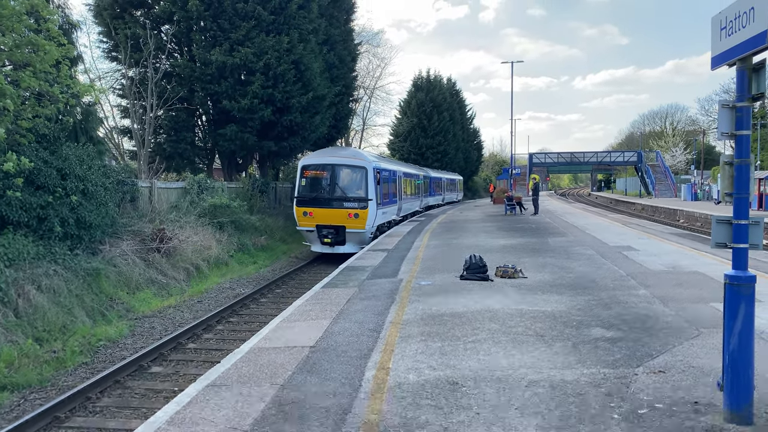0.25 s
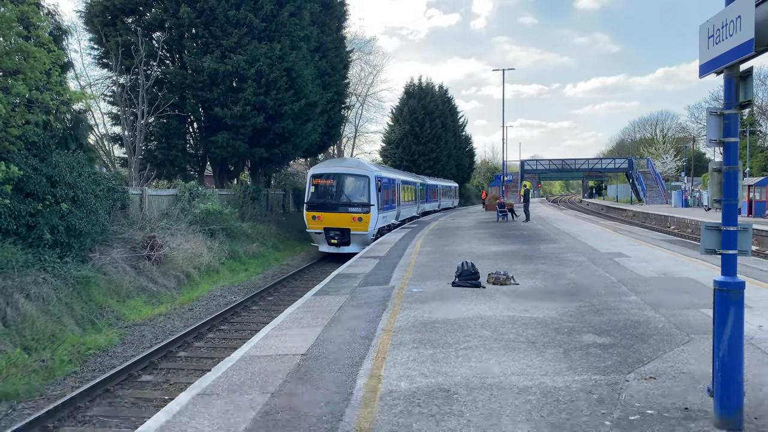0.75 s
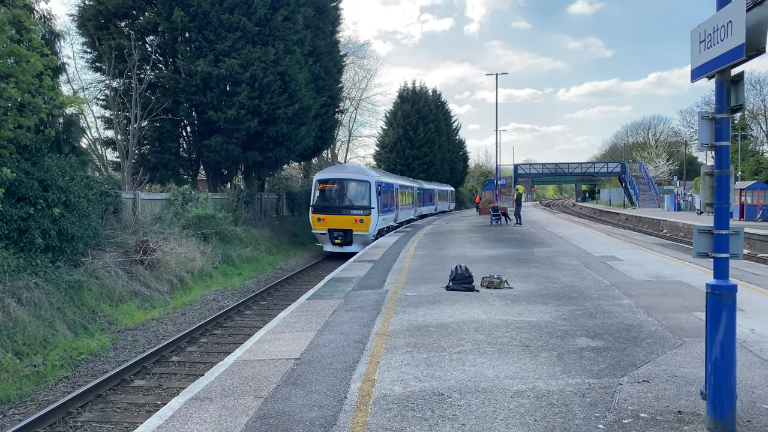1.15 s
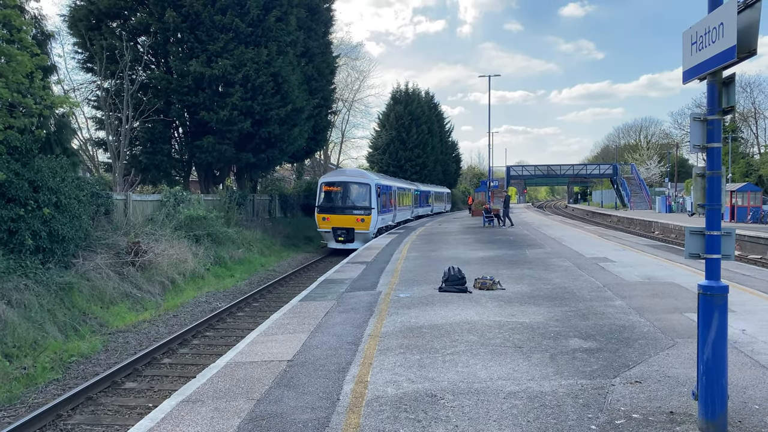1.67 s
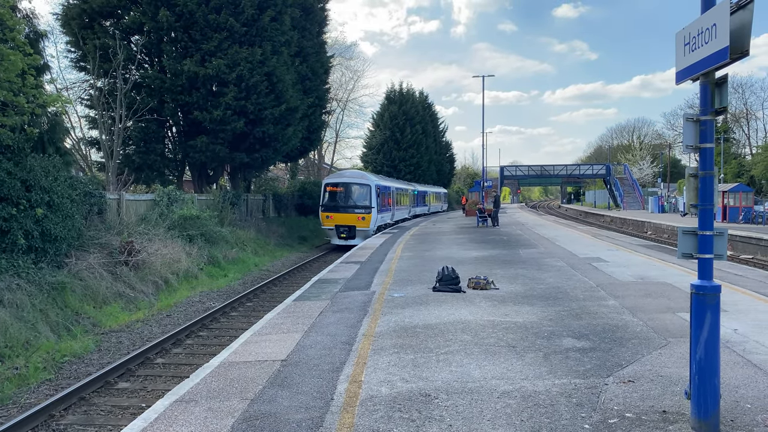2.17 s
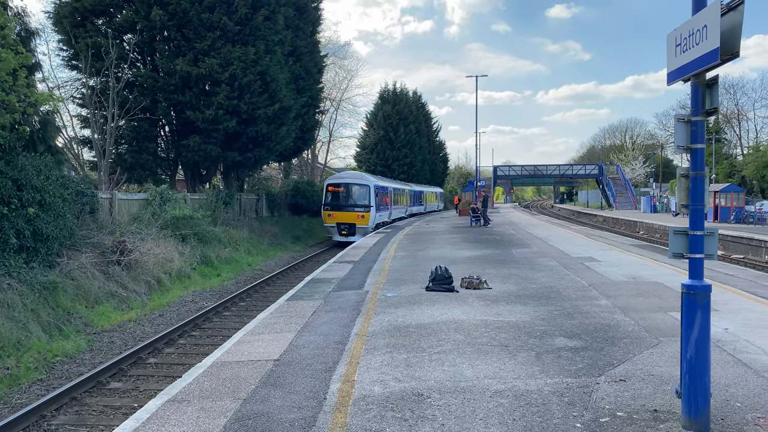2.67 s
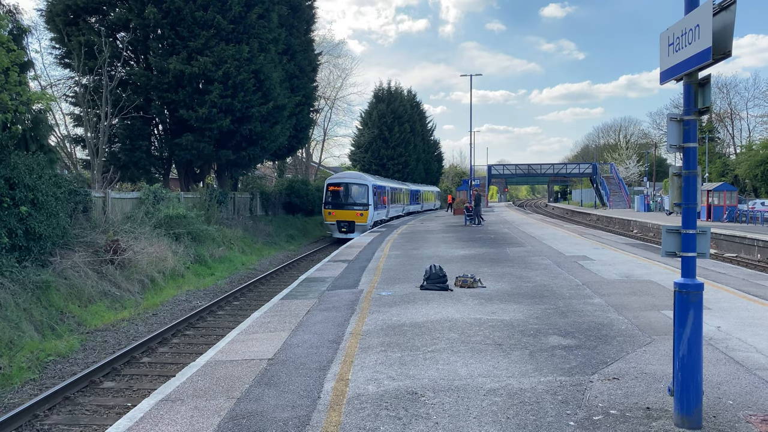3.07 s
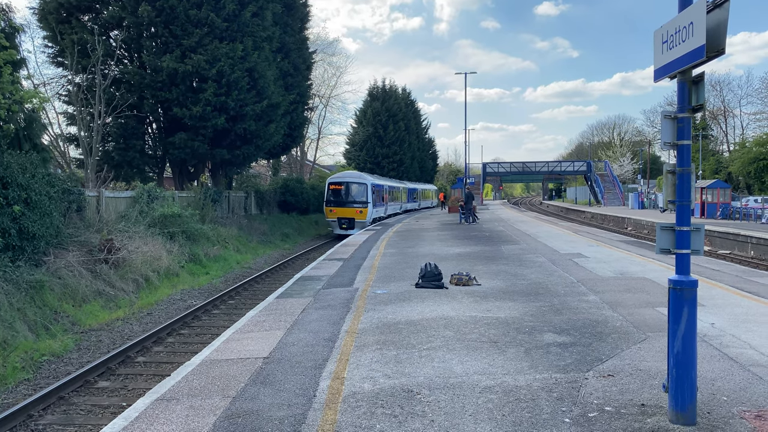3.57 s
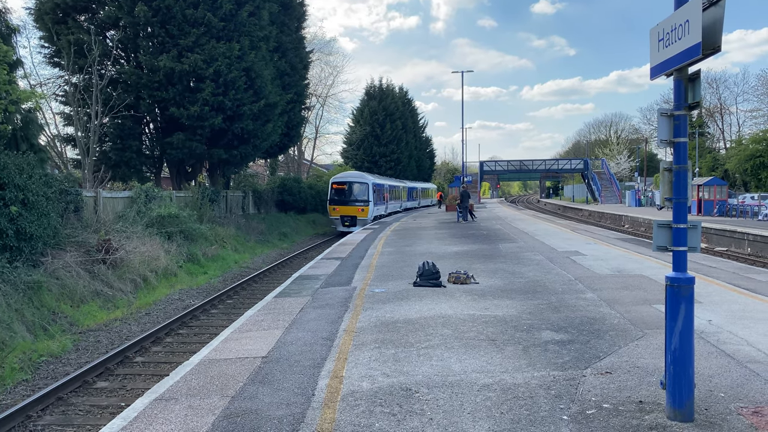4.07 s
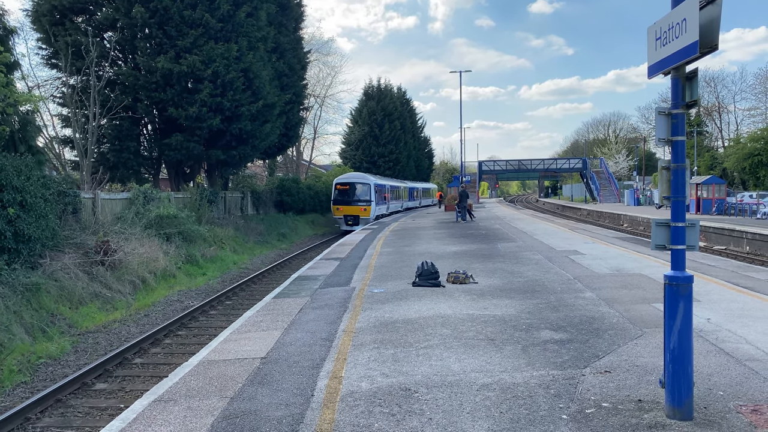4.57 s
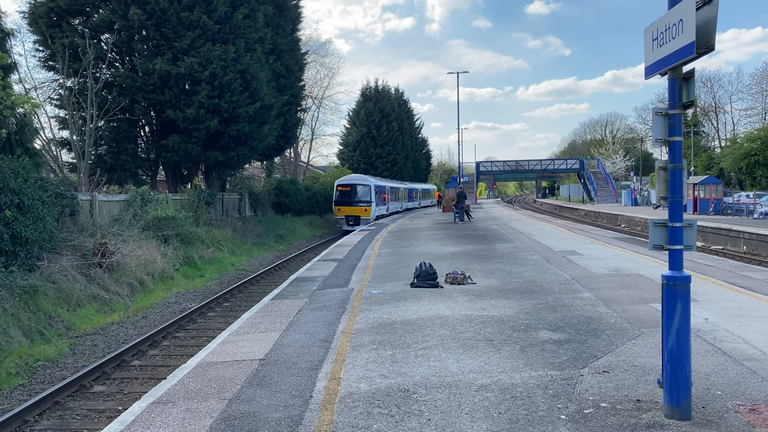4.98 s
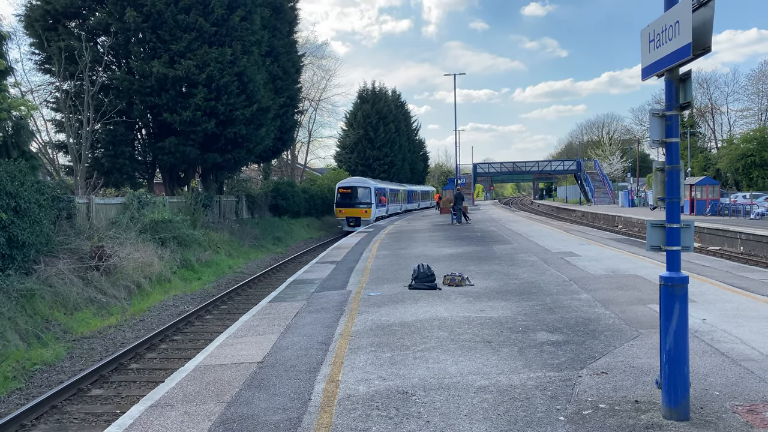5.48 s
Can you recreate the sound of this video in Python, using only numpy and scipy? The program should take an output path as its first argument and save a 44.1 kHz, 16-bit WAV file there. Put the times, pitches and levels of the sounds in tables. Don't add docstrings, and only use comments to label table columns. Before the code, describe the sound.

Outdoors on a platform, a hand-held stereo microphone catches a departing diesel train: a continuous mid-range roar, nearest at first, then sinking away without stopping. Irregular wind bursts thud and flutter close to the microphone, strong in the first second, lighter in the middle. A tiny far bird whistles briefly and a hedge hisses. At about five seconds a heavy gust hits, followed by small handling ticks.

```python
import sys
import numpy as np
from scipy import signal
from scipy.fft import rfft, irfft
from scipy.io import wavfile
from scipy.ndimage import uniform_filter1d

SR = 44100
rng = np.random.default_rng(int(sys.argv[2]) if len(sys.argv) > 2 else 0)


def waveform_to_disk(signal):
    frames = np.transpose(np.atleast_2d(signal))
    scaled = np.clip(frames, -1, 1) * 32767
    samples = np.round(scaled).astype(np.int16)
    wavfile.write(sys.argv[1], SR, samples)


def rack_gain(trim_db):
    fader = np.asarray(trim_db, float)
    return 10 ** (fader / 20)


N = 252693
HZ = np.maximum(np.fft.rfftfreq(N, 1 / SR), 1)
TIME = np.arange(N) / SR
SIDES = np.array([[.5], [-.5]])


def rms_one(x):
    return x / np.sqrt(np.mean(x ** 2) + 1e-20)


def columns(rows, at):
    key, *rest = np.transpose(rows)
    return [np.interp(at, key, column) for column in rest]


def by_pitch(rows):
    rows = np.array(rows, float)
    return columns(np.c_[np.log(rows[:, 0]), rows[:, 1:]], np.log(HZ))


def drift(rate_hz):
    step = 32
    count = N // step + 2
    slow_hz = np.fft.rfftfreq(count, step / SR)
    x = irfft(rfft(rng.standard_normal(count)) / (1 + (slow_hz / rate_hz) ** 2), count)
    return np.interp(np.arange(N) / step, np.arange(count), rms_one(x - x.mean()))


def coloured(spectrum):
    white = rfft(rng.standard_normal(N))
    return rms_one(irfft(white * rack_gain(by_pitch(spectrum)[0]), N))


def evened(x, share):
    envelope = uniform_filter1d(np.abs(signal.hilbert(x)), size=1500)
    return rms_one(x / envelope ** np.clip(share, 0, 1))


def swell(s, length_s):
    return np.exp(-(2 * (TIME - s) / length_s) ** 2)


def ports(x, lead_rad, stray=0, apart=0):
    turned = np.sqrt(1 - apart) * np.imag(signal.hilbert(x)) + np.sqrt(apart) * stray
    turned = turned * np.tan(np.clip(lead_rad, 0, 2.3) / 2)
    return np.array([x - turned, x + turned])


def train():
    # time_s, level_db
    train_level = [
        (0.0, -47.5),
        (3.17, -52),
        (4.13, -54.5),
        (4.47, -54.5),
        (5.73, -56),
    ]
    # pitch_hz, density_db_per_hz
    roar_spectrum = [(70, -58.5), (120, -30.5), (213, -11.5), (318, -4), (460, -4.5), (685, -3),
                     (1120, -6.5), (1500, -19.5), (2500, -22.5), (4200, -27.5), (7400, -43.5),
                     (8500, -52.5), (9500, -48), (15000, -84)]
    # pitch_hz, width_hz, lift_db
    roar_peaks = [(330, 85, 2), (686, 18, 4), (782, 41, 2.5), (884, 38, -4.5), (1040, 5.2, 11.5),
                  (990, 87, -3), (1820, 520, 9), (3315, 670, 4), (4630, 400, 6), (6330, 740, 5),
                  (12700, 5600, 7.5)]
    # pitch_hz, likeness_0_to_1, left_lead_rad, left_minus_right_db
    far_field = [(150, .7, .4, -1.2), (500, .5, 1.15, -1.2), (1000, .5, .9, -3.8), (1800, .55, .8, -.8),
                 (3500, .42, -.3, -.8), (5200, .45, -1.4, -1.4), (7000, .35, .3, -1), (9000, .65, 2.7, -.5),
                 (12000, .85, .3, -2.5)]
    air_loss = 0.077
    firing_hz, firing_depth = 38.9, 0.027
    patchy_db = 0.49

    level_db, = columns(train_level, TIME)
    colour_db, = by_pitch(roar_spectrum)
    for peak_hz, width_hz, lift_db in roar_peaks:
        colour_db = colour_db + lift_db / (1 + (2 * (HZ - peak_hz) / width_hz) ** 2)

    alike, lead_rad, tilt_db = by_pitch(far_field)
    alike = np.clip(alike, 0, 1)
    shared, *own = rfft(rng.standard_normal((3, N)))
    common = np.sqrt(alike) * shared * np.exp(1j * SIDES * lead_rad)
    separate = np.sqrt(1 - alike) * np.array(own)
    field = rack_gain(colour_db + SIDES * tilt_db) * (common + separate)
    middle = (HZ > 700) & (HZ < 2300)
    field = field / np.std(irfft(field.mean(0) * middle, N))

    together = drift(3.0)
    firing = np.cos(2 * np.pi * np.cumsum(firing_hz * (1 + 0.059 * drift(1.9))) / SR)
    octave = np.clip(np.log2(HZ / 100), 0, 8)
    out = 0
    for k in range(9):
        band = np.clip(1 - np.abs(octave - k), 0, 1)
        loss_db = air_loss * (2 ** k / 10 - 1.5) * (level_db - level_db.mean())
        gain_db = level_db + loss_db + patchy_db * (0.095 * together + drift(20.0))
        out = out + rack_gain(gain_db) * irfft(field * band, N)
    return out * (1 + firing_depth * firing)


def wind():
    # time_s, left_lead_rad
    crossing_angle = [(0, 1.5), (.3, 0.23), (.52, 1.3), (1.0, 1.56), (1.27, 1.3), (1.42, 0.25), (1.65, .6),
                      (2.05, 1.9), (2.42, 0.21), (2.9, 0.49), (3.43, 1.36), (3.9, 0.91), (4.1, 0.47),
                      (4.5, 0.45), (4.96, 1.76), (5.34, 1.86), (5.57, 1), (5.73, 2.5)]
    # pitch_hz, density_db_per_hz
    rumble_spectrum = [(10, -50), (25, -24), (40, -3), (60, 0), (82, 0), (98, -6), (116, -21), (300, -44),
                       (700, -140)]
    flutter_spectrum = [(30, -96), (80, -10.5), (115, -2), (160, 2.5), (210, -8), (300, -26.5), (900, -140)]
    ruffle_spectrum = [(60, -101.5), (160, -20), (230, -3.5), (330, -2.5), (480, -18.5), (800, -54.5),
                       (1500, -140)]
    crossing_sway_rad = 0.17
    lumpy_db, ragged_db = 1.0, 1.8
    ruffle_floor_db = -50

    rumble_db, flutter_db, ruffle_db = eddy_levels()
    lead_rad, = columns(crossing_angle, TIME)
    rumble_lead = lead_rad + crossing_sway_rad * drift(4.0)
    flutter_lead = lead_rad + crossing_sway_rad * drift(4.0)
    apart = np.clip(-(rumble_db + 27) / 9, .2, .95)

    ruffle_db = np.where(ruffle_db < ruffle_floor_db, 2 * ruffle_db - ruffle_floor_db, ruffle_db)
    lumps = drift(20.0)
    ragged = ragged_db * (lumps + drift(39.0))
    rumble_db = rumble_db + lumpy_db * lumps + 1.52 * drift(19.0) - .3
    sizes = ((rumble_spectrum, rumble_db, rumble_lead, apart),
             (flutter_spectrum, flutter_db + ragged - 5.5, flutter_lead, apart * 0.82),
             (ruffle_spectrum, ruffle_db + ragged - 4.0, flutter_lead, .1))
    out = 0
    for spectrum, gain_db, lead, share in sizes:
        eddies = evened(coloured(spectrum), 0.61)
        out = out + rack_gain(gain_db) * ports(eddies, lead, coloured(spectrum), share)
    return out * rack_gain(-1.5 * SIDES)


def eddy_levels():
    # time_s, rumble_db
    steady_wind = [(0, -29), (.25, -41.5), (.66, -34.5), (.87, -46), (1.3, -45.5), (1.6, -35),
                   (1.76, -40.5), (1.82, -45), (2.6, -47), (2.7, -39.5), (3.37, -35.5), (3.85, -41.5),
                   (4.0, -38), (4.8, -37), (5.25, -37.5), (5.275, -46), (5.46, -50), (5.73, -42.5)]
    # centre_s, length_s, peak_db, fineness (0 rumble, 1 flutter, 2 ruffle)
    gust_bursts = [(0.047, 0.043, -27.5, 0.08), (0.084, 0.081, -34, 1.08), (0.146, 0.031, -28.5, 0.0012),
                   (0.354, 0.36, -45.5, 1.73), (0.476, 0.031, -28.5, 0.42), (1.047, 0.44, -45.5, 1.45),
                   (0.597, 0.062, -33.5, 1.1), (0.725, 0.093, -30, 0.34), (0.814, 0.16, -33.5, 1.22),
                   (1.221, 0.036, -35.5, 0.24), (1.489, 0.18, -37.5, 1.32), (5.37, 0.064, -35.5, 0.54),
                   (1.781, 0.035, -35.5, 1.07), (2.045, 0.11, -43, 1.1), (2.153, 0.088, -36.5, 0.66),
                   (2.88, 0.03, -31.5, 0.08), (5.603, .03, -42, 0.13), (3.043, 0.029, -37, .1),
                   (3.579, 0.1, -34, 0.31), (3.707, 0.056, -39, 1.15), (3.815, 0.054, -34, 0.27),
                   (4.688, 0.091, -35, 0), (4.888, 0.07, -25, 0.0061), (5, 0.038, -17.5, 0.73),
                   (5.056, 0.1, -25.5, 1.12), (5.104, 0.047, -20.5, 0.65), (5.197, 0.093, -29.5, 0),
                   (5.34, 0.015, -23, 1.83), (5.529, 0.084, -40, 0), (5.642, 0.03, -32.5, 0.87)]
    flutter_db, flutter_follows = -50, 0.52
    ruffle_db, ruffle_follows = -54, 0.1
    size_loss_db = 12.5

    steady_db, = columns(steady_wind, TIME)
    swing_db = steady_db - steady_db.mean()
    levels_db = np.array([steady_db,
                          flutter_db + flutter_follows * swing_db,
                          ruffle_db + ruffle_follows * swing_db])
    power = rack_gain(2 * levels_db)
    size = np.arange(3)[:, None]
    for s, length_s, peak_db, fineness in gust_bursts:
        burst_db = peak_db - size_loss_db * (size - fineness) ** 2
        power = power + rack_gain(2 * burst_db) * swell(s, length_s) ** 2
    return 10 * np.log10(power)


def pops():
    # start_s, peak_db, top_hz, length_s
    shed_eddies = [(0.734, -22.5, 292, 0.0074), (0.853, -34, 330, 0.015), (1.459, -32.5, 531, 0.024),
                   (1.485, -33.5, 498, 0.013), (1.765, -29, 236, 0.029), (2.056, -35, 308, 0.022),
                   (2.116, -37, 317, 0.025), (2.293, -42.5, 375, 0.017), (4.846, -33.5, 300, 0.025),
                   (4.886, -31.5, 420, 0.015), (4.980, -25.5, 330, 0.024), (4.989, -30.5, 660, 0.0085),
                   (4.992, -22.5, 508, 0.011), (5.07, -28.5, 308, 0.011), (5.105, -25.5, 438, 0.01),
                   (5.3346, -28, 778, 0.00904), (5.35, -50, 308, 0.042), (5.366, -34.5, 425, 0.01),
                   (5.42, -34.5, 411, 0.01), (5.439, -41.5, 400, .012), (5.523, -40.5, 385, 0.014),
                   (5.635, -35, 330, 0.0099), (5.647, -36.5, 488, 0.0078)]
    ragged_db = 1.5
    out = np.zeros(N)
    t = TIME[:SR // 12]
    turns = rng.random((len(shed_eddies), 1))
    for (s, peak_db, top_hz, length_s), turn in zip(shed_eddies, turns):
        pitch_hz = top_hz * (0.15 + 1.136 * np.exp(-t / (0.67 * length_s)))
        shape = (np.e * 2.27 * t / length_s * np.exp(-2.5 * t / length_s)) ** 2
        pop = rack_gain(peak_db) * shape * np.sin(2 * np.pi * (np.cumsum(pitch_hz) / SR + turn))
        at = round(s * SR)
        out[at:at + len(t)] += pop[:N - at]
    return ports(out * rack_gain(ragged_db * drift(100.0)), 1.72) * rack_gain(-1.5 * SIDES)


def grip():
    # peak_s, level_db, rise_s, decay_s, left_minus_right_db
    finger_moves = [
        (4.972, -63, 0.01, 0.0067, -1.5),
        (5.422, -65, 0.00041, .001, 7),
        (5.609, -54, 0.00026, 0.00042, -13),
        (5.629, -76, 0.008, 0.016, 11),
    ]
    rub = coloured([(500, -76.0), (2000, -19), (4000, 7), (7000, -8), (13000, -18.5), (16000, -35.5)])
    out = np.zeros((2, N))
    for s, level_db, rise_s, decay_s, tilt_db in finger_moves:
        shape = np.exp(np.where(TIME < s, (TIME - s) / rise_s, (s - TIME) / decay_s))
        out += rack_gain(level_db + tilt_db * SIDES) * shape
    return out * ports(rub, .9)


def bird():
    # start_s, start_hz, end_hz, length_s, level_db, left_lead_rad
    whistles = [
        (2.20, 4700, 4550, 0.032, -68, 2),
        (2.22, 5300, 5080, 0.046, -64, 1.8),
        (2.27, 5200, 5100, .04, -65, 2.5),
        (2.365, 5400, 5050, .04, -67, 3.4),
        (2.515, 5400, 5200, 0.033, -69, 2.5),
        (2.535, 4970, 4480, 0.027, -61, 0.44),
        (2.68, 5250, 5100, .04, -59, 2.5),
        (4.21, 7700, 7440, .03, -81, 0.45),
    ]
    out = np.zeros((2, N))
    for s, start_hz, end_hz, length_s, level_db, lead_rad in whistles:
        part = np.clip((TIME - s) / length_s, 0, 1)
        pitch_hz = end_hz + (start_hz - end_hz) * (1 - part) ** 2
        phase = 2 * np.pi * np.cumsum(pitch_hz) / SR
        out += rack_gain(level_db) * np.sin(np.pi * part) * np.sin(phase + lead_rad * SIDES)
    return out


def leaves():
    # centre_s, length_s, level_db, brightness_db
    stirs = [
        (1.92, .38, -71.5, -9),
        (3.42, .66, -71, -15),
        (4.55, .45, -77, -14),
    ]
    # pitch_hz, density_db_per_hz
    leaf_spectrum = [(1500, -21), (3000, -20), (4500, 2), (5800, 4.5), (6050, -21), (8000, -23),
                     (16000, -56)]
    twig_spectrum = [(5000, -29), (6500, 3), (7500, -5), (9500, -12), (12000, -35), (16000, -51.5)]
    low = ports(coloured(leaf_spectrum), 1.2, coloured(leaf_spectrum), .5)
    high = ports(coloured(twig_spectrum), 2.3)
    out = 0
    for s, length_s, level_db, bright_db in stirs:
        puff = rack_gain(level_db) * np.exp(-(2 * (TIME - s) / length_s) ** 4)
        out = out + puff * (low + rack_gain(bright_db) * high)
    return out


def scene():
    return train() + wind() + pops() + grip() + bird() + leaves()


def low_pass(x):
    return signal.sosfilt(signal.butter(12, 15800, fs=SR, output="sos"), x)


def record(dry):
    # pitch_hz, density_db_per_hz
    hiss_spectrum = [(200, -13), (8000, 0), (12000, 3.5), (15000, -3), (20000, -23)]
    hiss_db = -99
    mix = dry + rack_gain(hiss_db) * coloured(hiss_spectrum)
    return low_pass(mix)


dry = scene()
out = record(dry)
waveform_to_disk(out)
```